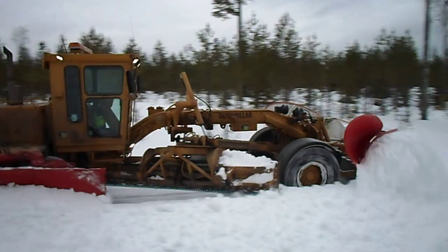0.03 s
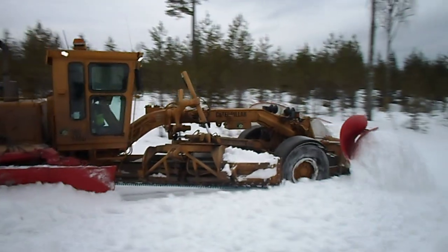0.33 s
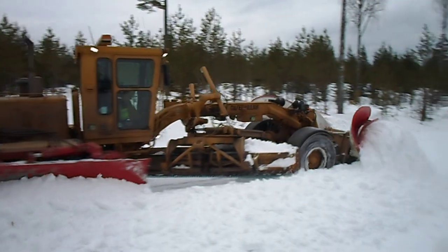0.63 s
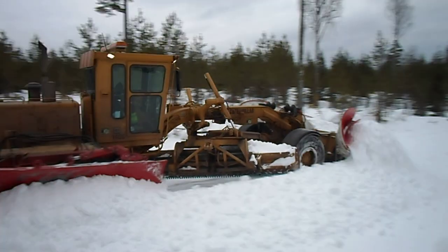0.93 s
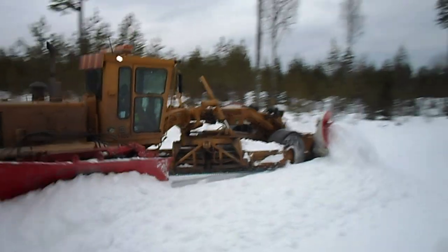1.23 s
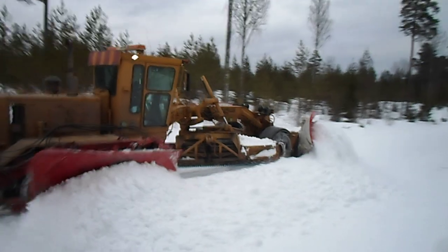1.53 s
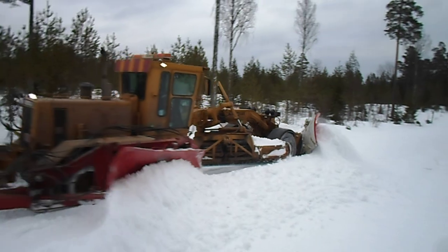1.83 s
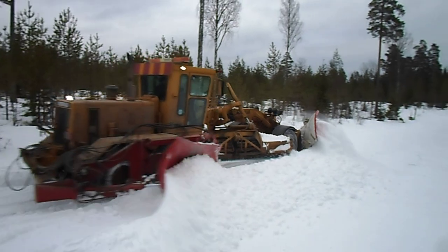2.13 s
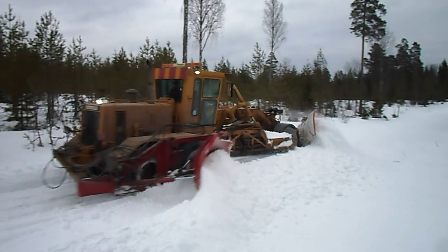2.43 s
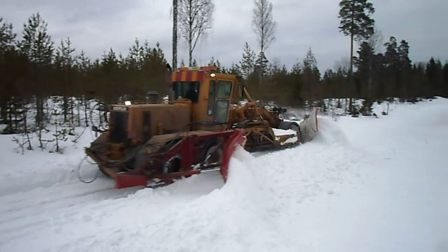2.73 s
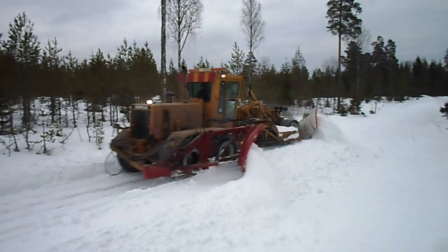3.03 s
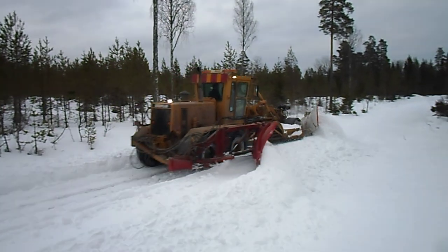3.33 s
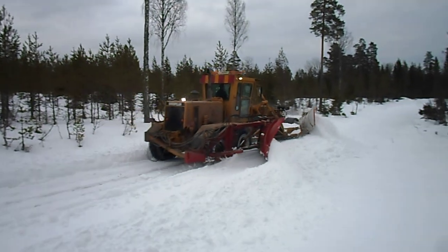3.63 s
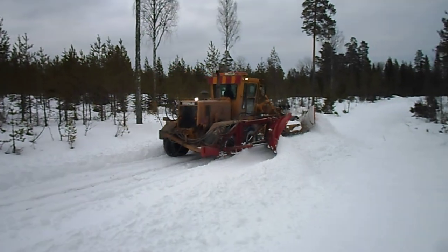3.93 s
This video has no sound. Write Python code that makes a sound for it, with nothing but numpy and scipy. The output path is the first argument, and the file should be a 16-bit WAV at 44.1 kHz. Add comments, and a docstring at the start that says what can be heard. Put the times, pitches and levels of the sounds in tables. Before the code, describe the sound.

A road grader ploughs by outdoors, its diesel engine holding a steady speed. Wind buffets the microphone first, then engine clatter and rushing snow grow louder, a cooling fan joins, and the machine recedes under more gusts.

```python
"""A road grader ploughs snow past on a forest road and drives away.
Wind gusts and eddies buffet the microphone first, over the drone of a six-cylinder diesel at steady speed.
From about 1 s snow rushes off the blades and the clatter of the firings swells.
Near 2.5 s the rear turns to the listener and the cooling fan comes in.
Then the grader fades under more gusts, eddy pops and a hollow wind flutter."""
import sys
import numpy as np
from scipy.fft import rfft, irfft, next_fast_len
from scipy.io import wavfile
from scipy.ndimage import map_coordinates

SR = 44100
rng = np.random.default_rng(int(sys.argv[2]) if len(sys.argv) > 2 else 0)


def unload_audio(sound):
    """Save the sound as a 16-bit wav file, at the path given as the first command line argument."""
    columns = np.transpose(np.atleast_2d(sound))
    # keep every value between -1 and 1, then stretch to whole-number steps
    steps = np.round(np.clip(columns, -1, 1) * 32767)
    wavfile.write(sys.argv[1], SR, steps.astype(np.int16))


N = 176400

# gusts on the microphone: start_s, length_s, level_db, upper_edge_hz
GUSTS = [(0, 0.17, -29.5, 203), (0.359, 0.06, -29.5, 182), (0.472, 0.092, -36.5, 170),
         (1.06, 0.043, -38, 198), (1.322, 0.027, -29.5, 223), (1.52, 0.042, -31, 110),
         (1.808, .12, -28.5, 70), (2.56, 0.064, -22.5, 232), (2.626, 0.038, -25, 410),
         (2.69, 0.16, -28.5, 91.5), (2.93, .07, -26.5, 169.3), (3.064, 0.098, -25.5, 59.55),
         (3.176, 0.051, -27, 282), (3.261, 0.071, -26, 246), (3.382, 0.083, -26, 352),
         (3.516, 0.055, -32.5, 276), (3.771, 0.054, -28, 90), (3.836, 0.19, -34, 416)]
# eddy pops: time_s, peak_db, centre_hz
EDDIES = [(0.013, -12.5, 41.7), (.019, -23, 850), (.044, -22, 427), (0.055, -25, 1010), (.1, -26, 900),
          (0.147, -19, 44.7), (.147, -27.5, 600), (0.368, -18, 75), (.376, -25, 800), (1.335, -25.5, 300),
          (1.82, -21, 260), (1.869, -19.5, 50), (2.6, -17, 169), (2.767, -17, 65), (3.033, -14, 358),
          (3.046, -15.5, 44.8), (3.088, -17, 59.6), (3.093, -14, 510), (3.191, -22, 820),
          (3.263, -18.5, 298), (3.384, -23.5, 850), (3.445, -19, 330), (3.461, -19.5, 55), (3.767, -16, 65),
          (3.811, -17.5, 300), (3.875, -18, 606)]
# steady wind: time_s, level_db
WIND_LEVEL = [(0, -36.5), (.7, -34.5), (.95, -41.5), (1.2, -36), (1.8, -30.5), (2.2, -33.5), (2.8, -32),
              (3.4, -37), (3.65, -37.5), (4, -39)]
# steady wind: freq_hz, density_db
WIND_SPECTRUM = [(10, 5), (25, 1.5), (50, 0), (90, 2), (160, -11.5), (300, -26.5), (800, -34), (3000, -78)]
# engine firings as heard: time_s, rate_hz
FIRING_RATE = [(0, 84.47), (.6, 83.55), (1.4, 85.58), (1.9, 86.46), (2.55, 86.4), (4, 86.81)]
# firing strength per cylinder: gain_db
CYLINDER_DB = [6, -0.5, 4, 5.5, -0.5, -1]
# exhaust drone: time_s, level_db
EXHAUST_LEVEL = [(0, -36.5), (.3, -50), (.8, -41.5), (1.4, -33.5), (2, -32.5), (2.55, -29), (2.7, -35),
                 (3, -36), (3.15, -37.5), (4, -42)]
# exhaust tones: firing_rate_multiple, gain_db
EXHAUST_ORDERS = [(1 / 2, -13), (1, 0), (2, -13), (7 / 3, -17), (8 / 3, -14.5), (3, -20), (16 / 3, -16),
                  (17 / 3, -19), (7, -21), (17 / 2, -20), (35 / 3, -21)]
# pipe and engine housing resonances: centre_hz, base_width_hz, gain_db
PIPE_MODES = [(215.4, 72.5, 0.5), (477, 42.6, -2), (711.5, 87, -4.5), (1020, 76, -4), (1373, 213, -10.5)]
# snow rush: time_s, level_db
SNOW_LEVEL = [(0, -51), (.35, -49.5), (.95, -43.5), (1.15, -38), (1.8, -33.5), (2.55, -36.5), (2.7, -37.5),
              (3, -39.5), (3.15, -46), (4, -46.5)]
# snow rush: freq_hz, density_db
SNOW_SPECTRUM = [(60, -17), (200, 14), (380, -2.5), (700, -4), (1300, -2.5), (2100, -8.5), (2600, -11),
                 (4000, -17), (7000, -18.5), (10200, -20), (11000, -40)]
# clatter, swelling on the pass, with two preset dips for recorder gain ducking in gusts: time_s, gain_db
CLATTER_LEVEL = [(0, -60.5), (.4, -58), (.75, -50.5), (1.03, -45.5), (1.12, -43.5), (1.45, -39.5),
                 (1.77, -35), (1.95, -38), (2.2, -34.5), (2.32, -37), (2.58, -33), (2.69, -48.5),
                 (3.03, -39.5), (3.11, -50), (4, -50)]
# clatter: freq_hz, density_db
CLATTER_SPECTRUM = [(150, -47), (330, 0), (600, 8), (1150, 0.5), (1450, -1), (1620, -14), (1900, 3),
                    (2200, -1), (2500, -10), (2900, -4), (3180, -5.5), (3350, -7.5), (3850, 2.5),
                    (4200, -1.5), (4780, -1), (5000, -12), (5350, -4.5), (5600, -10.5), (5850, -5),
                    (6200, -10), (7500, -12.5), (8600, -7.5), (10200, -15.5), (11000, -32.5), (11650, -29),
                    (12000, -33)]
# steel cover resonances: centre_hz, base_width_hz, gain_db
COVER_MODES = [(1016, 35, -2.5), (1355, 13, -5.5), (1844, 186, -2), (2052, 85, -2.5), (2714, 27, 0.5),
               (3163, 107, 1), (3643, 230, -2), (3820, 70, -1.5), (4490, 50, -2), (4673, 133, -5.5)]
# cooling fan: time_s, level_db
FAN_LEVEL = [(0, -70), (1.8, -52), (2.5, -41.5), (3, -41), (3.12, -48.5), (3.4, -45.5), (4, -45.5)]
# cooling fan: freq_hz, density_db
FAN_SPECTRUM = [(100, -7), (500, -0.5), (850, 3), (1020, 5), (1130, -5), (1300, -19), (1520, 0), (2100, -1),
                (2350, -15.5), (2750, 0), (3080, -8), (3280, 2), (3700, 2), (4100, -2), (4600, -1.5),
                (5100, -4), (7000, -16), (9500, -10), (10300, -16.5), (11000, -33)]
# flutter in the microphone opening: time_s, level_db
FLUTTER_LEVEL = [(0, -66), (2.5, -46), (3, -42), (3.3, -43), (3.66, -40), (3.76, -49.5), (3.92, -35),
                 (4, -47)]


def amp(db):
    """Decibels to gain."""
    return 10 ** (np.asarray(db) / 20)


def unit(x):
    """Scale to rms 1."""
    return x / np.sqrt(np.mean(x ** 2) + 1e-20)


def curve(rows):
    """Per-sample values from (time_s, value) rows."""
    return np.interp(np.arange(N) / SR, *np.transpose(rows))


def wobble(rate_hz):
    """Smooth random curve with knots at rate_hz."""
    knots = rng.standard_normal(int(N * rate_hz / SR) + 4)
    return map_coordinates(knots, [np.arange(N) * rate_hz / SR])


def filtered(x, response):
    """Apply a frequency response."""
    size = next_fast_len(N + SR // 2)
    return irfft(rfft(x, size) * response(np.fft.rfftfreq(size, 1 / SR)), size)[:N]


def coloured(x, spectrum):
    """Shape x by (freq_hz, density_db) rows; rms 1."""
    hz, db = np.transpose(spectrum)
    return unit(filtered(x, lambda f: amp(np.interp(np.log(f + 1), np.log(hz + 1), db))))


def turbulence(low_hz, high_hz, order):
    """Band of noise; order sets the upper slope."""
    return filtered(rng.standard_normal(N),
                    lambda f: f / np.hypot(f, low_hz) / np.hypot(1, (f / high_hz) ** order))


def resonance(f, centre_hz, width_hz):
    """Response of two equal band-passes in series."""
    return (1j * f * width_hz / (centre_hz ** 2 - f * f + 1j * f * width_hz)) ** 2


def ring(x, modes, widen):
    """Drive parallel resonances, base widths times widen; rms 1."""
    return unit(filtered(
        x, lambda f: sum(amp(db) * resonance(f, hz, widen * width_hz) for hz, width_hz, db in modes)))


def gusts(edge_s=0.021, lump_db=3):
    """Lumpy bursts of low wind noise, each with its own upper edge."""
    t, out = np.arange(N) / SR, np.zeros(N)
    for start_s, length_s, level_db, upper_hz in GUSTS:
        inside_s = np.minimum(t - start_s, start_s + length_s - t)
        window = np.clip(inside_s / edge_s + .5, 0, 1)
        air = turbulence(0.067 * upper_hz, upper_hz, order=2.4)
        burst = window * air * amp(lump_db * wobble(70))
        out += amp(level_db) * unit(burst) * np.sqrt(length_s * SR / N)
    return out


def eddies(wake_db=-15, wake_s=0.0033):
    """One pressure pulse each, in a brief rough wake; smaller eddies pop sharper."""
    t, out = np.arange(N) / SR, np.zeros(N)
    for time_s, peak_db, centre_hz in EDDIES:
        u = np.pi * centre_hz * (t - time_s)
        pulse = (1 - 2 * u * u) * np.exp(-np.minimum(u * u, 100))
        air = unit(turbulence(centre_hz / 2, 1.92 * centre_hz, order=4))
        wake = amp(wake_db) * air / (1 + ((t - time_s) / wake_s) ** 4)
        out += amp(peak_db) * (pulse + wake)
    return out


def wind_rumble(swell_db=2):
    """Steady wind: low noise with small swells."""
    gain = amp(curve(WIND_LEVEL) + swell_db * wobble(24))
    return gain * coloured(rng.standard_normal(N), WIND_SPECTRUM)


def exhaust(firings, gas_share=0.69, scatter_db=5.5, waver_db=0.4, pipe_db=-7):
    """Clean low tones, plus one rough puff per firing that rings pipe and housing."""
    tones = np.zeros(N)
    for multiple, db in EXHAUST_ORDERS:
        peak = np.sqrt(2) * amp(db + waver_db * wobble(7.28))
        tones += peak * np.sin(2 * np.pi * (multiple * firings + rng.random()))
    onsets = np.flatnonzero(np.diff(np.floor(firings)))
    puffs = np.zeros(N)
    puffs[onsets] = amp(np.resize(CYLINDER_DB, len(onsets)) + rng.normal(0, scatter_db, len(onsets)))
    gas = unit(rng.standard_normal(N) * (1 + np.cos(2 * np.pi * firings)))
    drive = np.sqrt(1 - gas_share) * unit(puffs) + np.sqrt(gas_share) * gas
    pipe = amp(pipe_db) * ring(drive, PIPE_MODES, widen=1.26)
    return amp(curve(EXHAUST_LEVEL)) * (tones + pipe)


def snow(surge_db=1.78, crumbs_per_s=820, crumb_db=-13):
    """Snow pours off the blades: a surging rush with crumbling lumps."""
    crumbs = (rng.random(N) < crumbs_per_s / SR) * rng.standard_normal(N)
    flow = rng.standard_normal(N) + amp(crumb_db) * unit(crumbs)
    return amp(curve(SNOW_LEVEL) + surge_db * wobble(18)) * coloured(flow, SNOW_SPECTRUM)


def clatter(firings, unevenness=0.49, depth=0.4, direct_db=-2, covers_db=-7):
    """Diesel noise swells with each firing, unevenly by cylinder, and rings the steel covers."""
    strength = amp(unevenness * np.take(CYLINDER_DB, firings.astype(int), mode="wrap"))
    swell = 1 - depth * np.cos(2 * np.pi * firings)
    knocks = strength * swell * rng.standard_normal((2, N))
    direct = amp(direct_db) * coloured(knocks[0], CLATTER_SPECTRUM)
    covers = amp(covers_db) * ring(knocks[1], COVER_MODES, widen=1.9)
    return amp(curve(CLATTER_LEVEL)) * (direct + covers)


def fan(flicker_db=0.8):
    """Slightly unsteady air from the rear cooling fan."""
    gain = amp(curve(FAN_LEVEL) + flicker_db * wobble(21.94))
    return gain * coloured(rng.standard_normal(N), FAN_SPECTRUM)


def wind_flutter(centre_hz=336, width_hz=182.6, flutter_db=3):
    """Wind flutters hollowly in the microphone opening."""
    hollow = unit(filtered(rng.standard_normal(N), lambda f: resonance(f, centre_hz, width_hz)))
    return amp(curve(FLUTTER_LEVEL) + flutter_db * wobble(25)) * hollow


def scene():
    """Grader, snow and wind; mono."""
    firings = np.cumsum(curve(FIRING_RATE)) / SR  # running count
    grader = exhaust(firings) + clatter(firings) + fan()
    return (grader + snow() + gusts() + eddies() + wind_rumble() + wind_flutter())[None]


def record(dry, ceiling=.23, top_hz=11900):
    """Round off the highest peaks, then band-limit."""
    limited = dry[0] / (1 + np.abs(dry[0] / ceiling) ** 10) ** (1 / 10)
    return filtered(limited, lambda f: f < top_hz)[None]


dry = scene()
out = record(dry)
unload_audio(out)
```